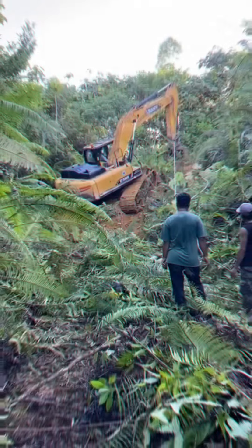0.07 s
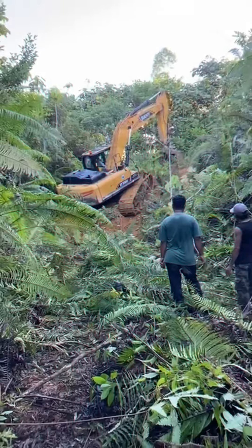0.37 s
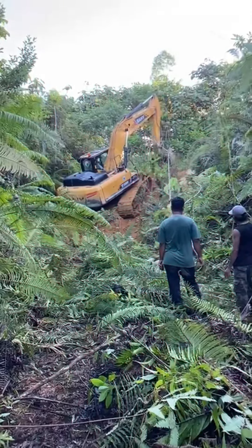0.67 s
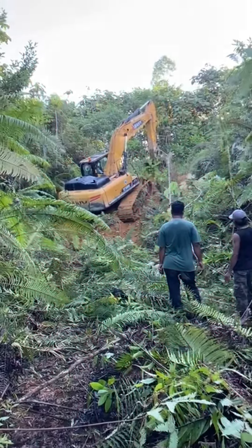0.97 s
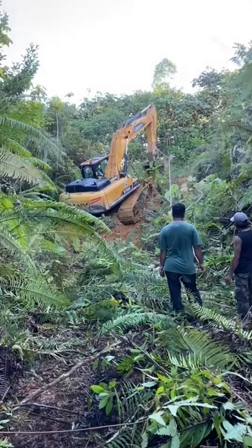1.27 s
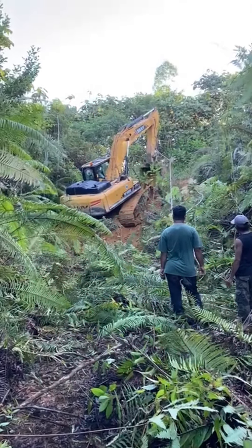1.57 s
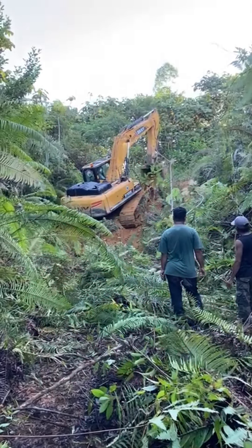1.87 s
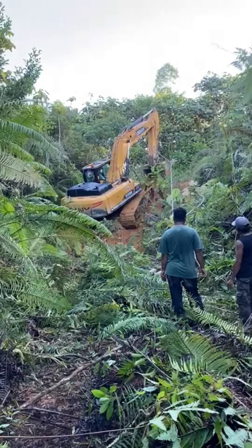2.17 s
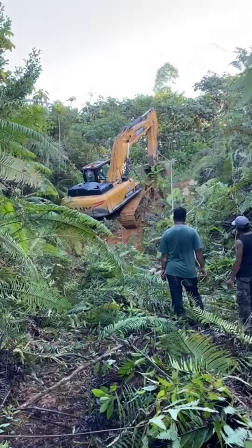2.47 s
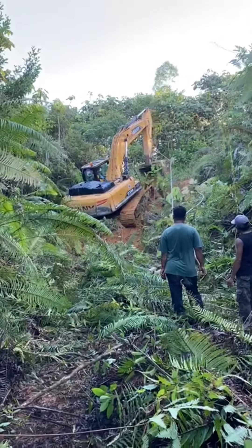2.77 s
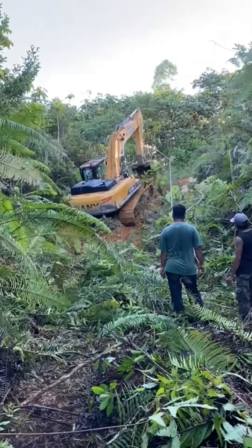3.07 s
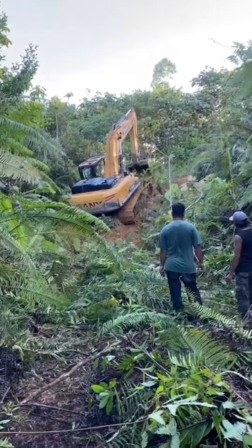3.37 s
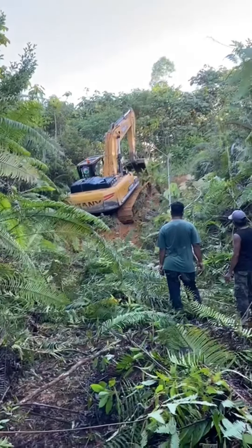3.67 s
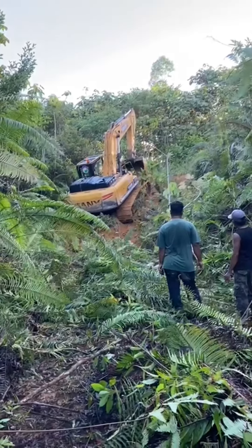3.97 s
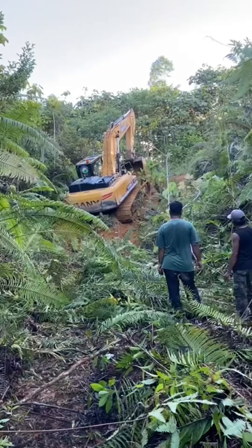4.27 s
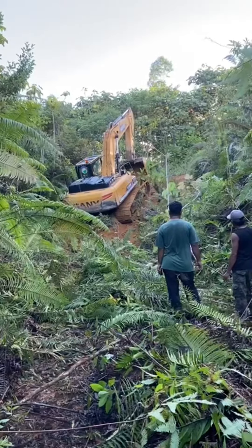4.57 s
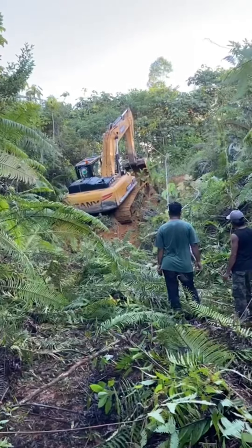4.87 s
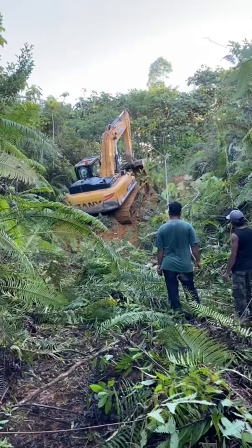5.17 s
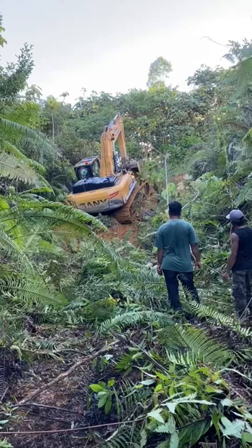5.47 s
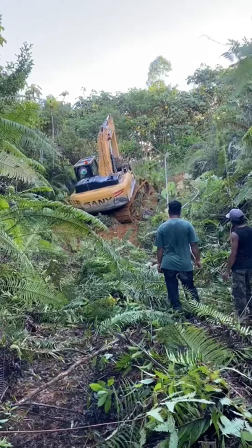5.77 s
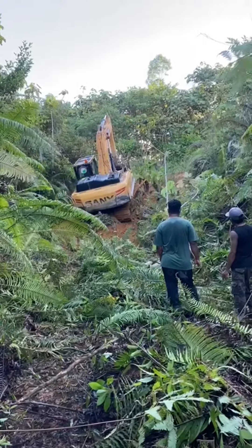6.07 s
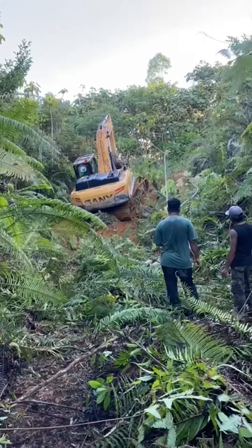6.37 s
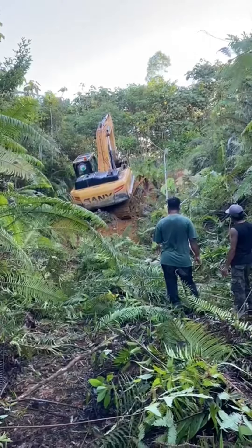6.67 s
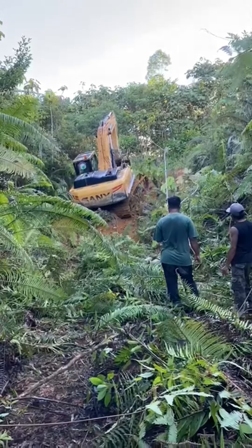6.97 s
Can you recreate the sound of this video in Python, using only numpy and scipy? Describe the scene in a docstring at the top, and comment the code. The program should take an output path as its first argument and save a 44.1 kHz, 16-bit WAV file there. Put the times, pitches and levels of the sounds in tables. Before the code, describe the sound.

Steel clanks and knocks from a digging excavator sound over its steady low engine rumble and thin hydraulic whine.

```python
"""A six-cylinder diesel drones some way off, sagging under load: an excavator digs on a forest slope.
Its firings sound the exhaust and make the casing throb; fan, gears and pump turn with the crankshaft,
so their tones sag with it. Oil hisses and squeals through the valves, and a turbocharger whistles faintly.
Impacts of bucket and tracks excite the modes of the steel, which clanks, rattles and booms.
The trees smear each blow and scatter the sound, so that it differs between left and right."""
import sys
import numpy as np
from scipy import signal
from scipy.fft import rfft, irfft, next_fast_len
from scipy.io import wavfile

SR = 44100
rng = np.random.default_rng(int(sys.argv[2]) if len(sys.argv) > 2 else 0)


def generate_wav(signal):
    """Clip the signal to [-1, 1] and save it as 16-bit WAV at the path in sys.argv[1]."""
    frames = np.transpose(np.atleast_2d(signal))
    scaled = np.clip(frames, -1, 1) * 32767
    pcm = np.round(scaled).astype(np.int16)
    wavfile.write(sys.argv[1], SR, pcm)


N = 313551
PADDED = next_fast_len(N + SR // 4, True)
TIME, FREQS = np.arange(N) / SR, np.maximum(np.fft.rfftfreq(PADDED, 1 / SR), 1)

# engine speed, sagging whenever the pump takes load: (time [s], firing rate [Hz])
FIRING_RATE = [(0, 89.2), (.45, 88.3), (.7, 89.3), (1.05, 89), (1.27, 85.8), (1.45, 86.5), (1.8, 88.5),
               (2.1, 89.3), (2.6, 88.4), (3.0, 89.4), (3.35, 88.5), (3.58, 86.0), (3.78, 86.7), (4.0, 87.5),
               (4.3, 90), (4.5, 90.3), (4.63, 86.7), (5.05, 88.8), (5.95, 88.9), (6.13, 86.4), (6.5, 87.3),
               (7.11, 90.2)]
# how hard the machine strains: (time [s], relative level [dB])
STRAIN = [(0.0, -30), (0.42, -29), (1.19, -30.5), (1.76, -25.5), (2.04, -25.5), (3.42, -29.5), (3.86, -25),
          (4.1, -26.5), (4.43, -25.5), (5.25, -22.5), (5.58, -28), (7.11, -29)]
# exhaust partials: (multiple of the firing rate [1], relative level [dB])
EXHAUST_PARTIALS = [(5 / 6, -26), (1, -1.56), (1.26, -15.5), (2, -8.5), (3.2, -33), (6.3, -19.5)]
# noise spectra of the engine and its cooling duct: (frequency [Hz], relative density [dB])
RUMBLE_SPECTRUM = [(20, -41), (35, -19), (48, -15.5), (62, -3), (80, -6.5), (112, 0.5), (135, -3),
                   (175, -7), (205, -20), (260, -20.5)]
CASING_SPECTRUM = [(150, -5.5), (205, -0.5), (250, -5.5), (310, -4.5), (380, -2.5), (470, -5), (540, -13.5),
                   (620, -23.5), (800, -48)]
CLATTER_SPECTRUM = [(480, 5), (640, 3), (850, 1), (1130, 3), (1450, -3), (1750, -6.5), (2050, -9),
                    (2400, -4.5), (2700, -12.5), (3000, -30), (4000, -26)]
DUCT_SPECTRUM = [(400, -18.5), (435, -3), (458, -5), (490, -10)]
# resonances of the engine covers: (frequency [Hz], width [Hz], boost [dB])
COVER_MODES = [(286.1, 3.6, 7), (455, 9.6, 2.5), (473, 6, 7)]
# the duct drones while it faces the listener: (time [s], relative level [dB])
DUCT_LEVEL = [(0, -28.5), (.7, -32.5), (1.17, -27), (1.4, -41), (1.75, -29), (2.1, -42), (2.6, -29.5),
              (3.1, -34.5), (3.4, -36.5), (7.11, -47.5)]

# blows of bucket and tracks: (time [s], strength [dB], hardness [dB], extra thud [dB],
# extra ring [dB], centre of the ring [Hz], rattle length [s])
BLOWS = [(1.115, -19, 2, -0.5, 1.5, 1110, 0.032), (1.474, -22.5, -6, 4.5, -1, 804, 0.031),
         (1.554, -12.5, 4, -2, 0.5, 1080, 0.043), (1.686, -28.5, -6, 8.5, -5, 826, 0.012),
         (1.794, -16, 14, 1, 6.5, 1165, 0.037), (1.905, -17, -5, 2.5, -1, 800, .035),
         (2.306, -27.5, -2, -4, 3, 950, 0.0079), (2.362, -25.5, 3, 2, 4.5, 800, 0.015),
         (2.5, -23.5, 7, -2, 2.5, 1020, 0.026), (2.666, -24.5, 5, 1, 5.5, 900, 0.02),
         (2.914, -21, -11, -1, -1.5, 940, 0.015), (3.161, -17, -6, 0, -8, 1090, 0.013),
         (3.822, -17.5, 0, 1.5, 1, 810, 0.023), (3.847, -14, -5.5, 1, 2, 810, 0.026),
         (4.029, -15.5, 0, 2.5, -2.5, 854, 0.075), (4.08, -13.5, 5, 1.5, 3.5, 870, 0.077),
         (4.219, -19, -5.5, 0.5, 3, 875, 0.057), (4.283, -20.5, -32, 3.5, 9, 860, 0.011),
         (4.377, -30, -17, 7, 10, 880, 0.013), (4.628, -18.5, -5, 4.5, -6, 730, 0.037),
         (4.731, -17.5, -2, 4, 2.5, 1000, 0.074), (4.774, -13, 3, 1.5, 2.5, 713, 0.048),
         (5.024, -13, 10.5, 0.5, -3.5, 920, 0.026), (5.046, -12, 6.5, 0, 7, 975, 0.0075),
         (5.199, -14.5, 3.5, 1, 0.5, 920, 0.027), (5.356, -17.5, 0, 2, 5.5, 975, 0.015),
         (5.379, -15.5, -3, -1.5, 3, 830, 0.016), (5.407, -19.5, 7, 3.5, -16, 740, 0.023),
         (5.835, -16, -9, -5, -11, 915, 0.092), (6.634, -11, -2, -4.5, -3, 746, 0.025),
         (6.851, -20.5, -4, -1.5, 1.5, 1080, 0.019), (6.987, -14.5, 0, -5, -0.5, 1110, 0.043)]
# spectra of the four parts of a blow: (frequency [Hz], relative density [dB])
THUD_SPECTRUM = [(35, -29), (65, 4.5), (130, -1.5), (240, -2.5), (285, 1.5), (350, -1.5), (480, 1),
                 (600, -18), (850, -7)]
CLANK_SPECTRUM = [(450, -19), (640, 3), (830, -3), (1030, 2.5), (1200, -14.5), (1450, -17)]
CLACK_SPECTRUM = [(1050, -32), (1350, 9.5), (1480, 3.5), (1700, 0), (2000, 0.5), (2350, 2.5), (2750, -8),
                  (3600, -36)]
CRACK_SPECTRUM = [(2300, -3.5), (3100, 10.5), (4300, 3), (5500, 2.5), (7500, -8), (9800, -7.5),
                  (12000, -20)]
# resonances of the bucket's steel: (frequency [Hz], width [Hz], boost [dB])
STEEL_MODES = [(357, 36, 7.5), (717, 7.9, 8.5), (793, 26, -5), (940, 47, 0), (1128, 37, 11.5),
               (1390, 70, -6)]
# ringing plates of the bucket: (frequency [Hz], relative level [dB])
PLATE_MODES = [(703, -11.5), (780, -9), (830, -7), (915, -10), (1020, -15), (1163, -9)]
# steel meets steel squarely: (time [s], level [dB], tilt [dB/octave])
SNAPS = [(1.478, -25, -14), (1.56, -23, -1), (1.798, -26.5, -2), (1.909, -16.5, -13), (2.313, -22, -13),
         (2.669, -25.5, -6), (3.175, -22.5, 3), (3.848, -19, -12.5), (4.29, -25, -12), (5.058, -19, 1.5),
         (5.193, -21, -1), (5.356, -22.5, -5), (5.38, -16.5, -7), (6.636, -31, -3), (6.988, -20, 4)]
# plate modes that a snap excites: (frequency [Hz])
SNAP_MODES = [826, 987, 1190, 1418, 1830, 2265]
# the hollow bucket knocks on earth and roots: (time [s], relative level [dB], centre of the boom [Hz])
KNOCKS = [(1.688, -9.5, 430), (1.817, -9, 333), (2.308, -18, 453), (2.912, -18, 420), (3.148, -18, 380),
          (4.087, -9, 390), (4.14, -11.5, 310), (4.287, -9, 430), (4.385, -15.5, 292), (4.626, -19, 404),
          (4.782, -15, 410), (5.059, -14, 320), (5.242, -11, 310)]
# modes of the bucket's shell: (frequency [Hz])
SHELL_MODES = [277, 326.5, 348, 391, 433, 481]
# the machine rocks on its tracks: (time [s], frequency [Hz], level [dB])
BUMPS = [(1.683, 71.7, -13.5), (1.83, 130.4, -19), (1.91, 139.2, -17), (3.862, 71, -13.5), (4.07, 79.5, -8),
         (4.37, 73, -22), (4.791, 90, -15), (5.4, 102, -14.5), (5.707, 81, -18.5), (5.85, 57.5, -19.5),
         (6.631, 145, -17)]

# pump harmonics: (multiple of the piston rate [1], relative level [dB])
PUMP_HARMONICS = [(2, -3), (4, -13), (6, -14), (8, -23), (9, -13.5), (10, -13.5), (12, -19)]
# singing valves: (time [s], length [s], multiple of the piston rate [1], level [dB])
SQUEALS = [(.02, 1, 16, -57), (0.546, 0.36, 9, -46), (1.08, 0.23, 12, -46), (1.244, .26, 9, -37.5),
           (1.23, 0.27, 2, -31), (2.8, 0.31, 9, -43), (3.37, 0.21, 12, -39), (3.38, .16, 20, -55),
           (4.504, 0.14, 9, -43), (3.37, .17, 14, -45), (3.603, 0.28, 9, -43), (4.56, 0.19, 14, -42),
           (4.95, 0.77, 14, -56), (5.03, 0.29, 16, -48), (5.88, 0.17, 14, -50), (6.247, 0.12, 12, -48)]
# brief, thin, high squeaks, mostly of the hydraulics: (time [s], length [s], frequency [Hz], level [dB])
SQUEAKS = [(1.09, .1, 3150, -43), (3.968, 0.064, 3160, -43), (4.718, 0.036, 5180, -46)]
# noise of oil through the valves: (time [s], relative level [dB])
OIL_FLOW = [(0.0, -40), (1.08, -42), (1.22, -39.5), (1.48, -39), (2.18, -42), (2.65, -42), (3.37, -45.5),
            (3.42, -40.5), (3.52, -40.5), (3.62, -41), (4.06, -38.5), (4.2, -45), (4.5, -42.5),
            (5.27, -40.5), (5.6, -43), (5.96, -44.5), (7.11, -41.5)]
# spectra of the oil's hiss and fine spray: (frequency [Hz], relative density [dB])
HISS_SPECTRUM = [(2200, 18), (3000, 11), (3400, 11.5), (3900, 7), (4300, 7), (4800, 6.5), (5200, 0.5),
                 (6000, 6), (6700, -20.5), (7300, -9.5), (8300, -25.5), (9500, 0.5)]
SPRAY_SPECTRUM = [(6200, 3), (7200, 7), (8500, 3), (9500, 3), (10500, 3.5), (11700, 0)]
# resonances of valve block and hoses: (frequency [Hz], width [Hz], boost [dB])
VALVE_MODES = [(3410, 120, 2.5), (4350, 230, 5.5), (5214, 310, 11.5)]
# spurts of fine spray: (time [s], Gaussian width [s], level [dB])
SPURTS = [(.48, 0.3, -51), (3.92, 0.041, -40), (4.09, 0.079, -49.5), (6.56, 0.081, -46.5)]

# gear whine, fading as the machine swings round: (time [s], low mesh level [dB], high mesh level [dB])
GEAR_LEVELS = [(0, -36, -35.5), (.35, -43, -48.5), (.53, -40, -44.5), (.6, -34, -38), (.74, -29.5, -43),
               (.95, -37, -50.5), (2.2, -44, -41), (2.5, -33.5, -47), (3.1, -38.5, -43.5), (3.4, -49, -50),
               (4.2, -34, -59), (7.11, -52.5, -73)]
# the turbocharger spools up and coasts down: (time [s], frequency [Hz])
TURBO_PITCH = [(0, 9100), (.2, 8890), (.72, 8900), (1.18, 8150), (1.45, 8900), (1.7, 9230), (2.1, 8680),
               (2.5, 8080), (2.97, 8160), (3.5, 7700), (4.1, 8900), (4.5, 8470), (4.8, 8950), (5.1, 8450),
               (5.45, 8680), (5.75, 8580), (6.0, 8300), (6.55, 9600), (6.75, 9600), (6.95, 9200),
               (7.11, 9080)]
# two microphone ports: (frequency [Hz], left minus right [dB], left lead [rad], coherence [0-1])
PORTS = [(200, 0, 0, 1), (300, -.8, .03, .995), (450, -3.5, .45, .98), (600, .5, 1.2, .88),
         (700, 6, 1.7, .7), (790, 13, 3.9, .25), (880, 9, 5.1, .87), (1000, 4.5, 5.4, .87),
         (1200, 1, 6.1, .96), (1450, 5, 6.5, .93), (1650, 6, 5.6, .4), (2100, 0, 6.1, .97),
         (2650, 0, 6.9, .8), (2880, -2, 8.3, .3), (3150, -1, 6.8, .7), (3450, 0, 6.3, .5),
         (4200, 0, 6.3, .94), (5400, 0, 6.35, .87), (6000, .5, 7.6, .45), (6600, 0, 9.42, .999),
         (8100, 0, 9.43, .999), (8800, 0, 10.9, .45), (9500, 0, 12.57, .99)]


def excavator(free_hz=89.2, loaded_hz=87.0):
    """Governor droop: speed sags in proportion to load, and all that the crankshaft drives follows."""
    firing_hz, = in_time(FIRING_RATE)
    firings = np.cumsum(firing_hz) / SR  # phase in cycles
    strokes = 3 * firings  # nine pump pistons a turn give three pulses a firing
    load = np.clip((free_hz - firing_hz) / (free_hz - loaded_hz), 0, 1)
    throb = np.cos(2 * np.pi * firings) + np.cos(np.pi * firings)
    engine = diesel(firings, load, throb) + cooling(firings, throb) + gears(firings) + turbocharger()
    hydraulics = pump(strokes, load) + squeals(strokes, firings) + oil(strokes) + hose_ring(strokes)
    digging = blows() + plate_ring() + snaps() + knocks() + bumps()
    return engine + digging + hydraulics + squeaks()


def diesel(firings, load, throb):
    """Periodic forcing: firings sound an exhaust note that swells with load, and shake the casing."""
    strain_db, = in_time(STRAIN)
    swing_db = strain_db - strain_db.mean()
    note = sum(from_db(db) * tone(k * firings, waver_db=1.1, blur_rad=0.074, rate_hz=7.8)
               for k, db in EXHAUST_PARTIALS)
    exhaust = from_db(-34 + 10 * load + 0.12 * swing_db) * note
    rumble = from_db(-28 + 0.29 * swing_db) * noise(RUMBLE_SPECTRUM)
    casing = from_db(-29 + swing_db + 1.1 * throb) * noise(CASING_SPECTRUM, COVER_MODES)
    clicks = colour(grains(per_s=6000, spread_db=3.5), CLATTER_SPECTRUM)
    clatter = from_db(-36 + 0.21 * swing_db + 0.25 * throb) * clicks
    return exhaust + rumble + casing + clatter


def cooling(firings, throb):
    """Blade passage gives the fan its hum; resonance narrows the duct's noise to a drone."""
    fan = from_db(-30.5) * tone(1.8 * firings, waver_db=1.7, blur_rad=0.11, rate_hz=17)
    duct_db, = in_time(DUCT_LEVEL)
    return fan + from_db(duct_db - 2.6 + 2 * throb) * noise(DUCT_SPECTRUM)


def blows():
    """Impact noise: bursts of contacts excite frame and bucket; the harder the blow, the brighter."""
    _, db, hardness_db, thud_db, ring_db, _, _ = np.transpose(BLOWS)
    thud = blow_envelope(db + thud_db - 9, rise_s=0.012, t60=0.53, tail_db=-10, tail_t60=1.0)
    thud *= colour(grains(per_s=1200, spread_db=1.0), THUD_SPECTRUM, STEEL_MODES)
    clank = blow_envelope(db + ring_db - 18.5, rise_s=0.016, t60=0.32, tail_db=-5.5, tail_t60=1.0)
    clank *= colour(grains(per_s=1600, spread_db=6.5), CLANK_SPECTRUM, STEEL_MODES)
    clack_db, crack_db = db + 0.41 * hardness_db - 19, db + 0.81 * hardness_db - 31.5
    clack = blow_envelope(clack_db, rise_s=0.003, t60=0.42, tail_db=-26, tail_t60=0.19)
    clack *= colour(grains(per_s=3000, spread_db=1.5), CLACK_SPECTRUM)
    crack = blow_envelope(crack_db, rise_s=0.0033, t60=0.41, tail_db=-11, tail_t60=0.29)
    crack *= colour(grains(per_s=3800, spread_db=1.0), CRACK_SPECTRUM)
    return thud + clank + clack + crack


def blow_envelope(levels_db, rise_s, t60, tail_db, tail_t60, contact_db=-4.5, contact_s=0.014):
    """Incoherent blows add in power: each hits, rattles on, dies and reverberates among the trees."""
    power = np.zeros(N)
    for (s, *_, rattle_s), db in zip(BLOWS, levels_db):
        start = int((s - rise_s / 2) * SR)
        age = TIME[:N - start][:SR]
        after = np.maximum(age - rattle_s, 0)
        contact = from_db(contact_db) * np.exp(-age / contact_s)
        rattle = from_db(-60 * after / t60)
        tail = from_db(tail_db - 60 * after / tail_t60)
        shape = np.minimum(age / rise_s, 1) * (contact + rattle + tail)
        power[start:start + len(age)] += (from_db(db) * shape) ** 2
    return np.sqrt(power)


def plate_ring(rise_s=0.006, t60=0.25, fall_db_per_octave=63):
    """Free vibration: a blow sets the bucket's plates ringing, most of all the one where it lands."""
    out = np.zeros(N)
    for s, db, _, _, ring_db, centre_hz, _ in BLOWS:
        start = int(s * SR)
        age = TIME[:N - start][:SR // 4]
        fade = np.minimum(age / rise_s, 1) * from_db(db + ring_db - 60 * age / t60)
        for hz, plate_db in PLATE_MODES:
            gain = from_db(plate_db - fall_db_per_octave * abs(np.log2(hz / centre_hz)))
            out[start:start + len(age)] += gain * fade * sine(hz * age)
    return out


def snaps(decay_s=0.005):
    """Impulse response: a square hit rings several plate modes for a few milliseconds."""
    out, age = np.zeros(N), TIME[:SR // 20]
    fade = np.minimum(age * SNAP_MODES[-1], 1) * np.exp(-age / decay_s)
    for s, db, tilt_db in SNAPS:
        start = int(s * SR)
        plates = sum(from_db(tilt_db * np.log2(hz / SNAP_MODES[0])) * sine(hz * age)
                     for hz in SNAP_MODES)
        out[start:start + len(age)] += from_db(db) * fade * rms_one(plates)
    return out


def knocks(rise_s=0.004, t60=0.12, fall_db_per_octave=26):
    """Damped shell modes: the bucket booms according to where it lands, and earth soon stills it."""
    out, age = np.zeros(N), TIME[:SR // 4]
    for s, db, centre_hz in KNOCKS:
        start = int(s * SR)
        shell = sum(from_db(-fall_db_per_octave * abs(np.log2(hz / centre_hz)))
                    * sine(hz * age, spread_cycles=0.35) for hz in SHELL_MODES)
        fade = np.minimum(age / rise_s, 1) * from_db(db - 2 - 60 * age / t60)
        out[start:start + len(age)] += fade * rms_one(shell)
    return out


def bumps(rise_s=0.019, t60=0.41):
    """Damped oscillation: the whole machine bounces briefly on its tracks."""
    out = np.zeros(N)
    for s, hz, db in BUMPS:
        age = np.maximum(TIME - s, 0)
        out += np.minimum(age / rise_s, 1) * from_db(db - 60 * age / t60) * sine(hz * age)
    return out


def pump(strokes, load):
    """Pressure ripple: the pistons whine at harmonics of their stroke rate, louder under load."""
    whine = sum(from_db(db) * tone(k * strokes, waver_db=4.5, blur_rad=0.66, rate_hz=21)
                for k, db in PUMP_HARMONICS)
    return from_db(-42.5 + 7 * load) * whine


def squeals(strokes, firings):
    """Amplitude modulation: pistons and firings chop a valve's song on one pump harmonic."""
    chop = 1 + 0.4 * np.cos(2 * np.pi * strokes) + 0.25 * np.cos(2 * np.pi * firings)
    return sum(from_db(db) * swell(s, length) * chop * tone(k * strokes, waver_db=2)
               for s, length, k, db in SQUEALS)


def oil(strokes):
    """Flow noise: oil hisses through the valves, pulsing with the pistons, and spurts in fine spray."""
    flow_db, = in_time(OIL_FLOW)
    flutter_db = 0.5 * drift(rate_hz=25) + 0.73 * np.cos(2 * np.pi * strokes)
    hiss = from_db(flow_db - 1.7 + flutter_db) * noise(HISS_SPECTRUM, VALVE_MODES)
    spurts = sum(from_db(db) * np.exp(-0.5 * ((TIME - s) / width) ** 2) for s, width, db in SPURTS)
    spray = np.hypot(from_db(flow_db - 12.5), spurts) * noise(SPRAY_SPECTRUM)
    return hiss + spray


def gears(firings):
    """Tooth meshing: two gear pairs whine at fixed multiples of the crankshaft's speed."""
    low_db, high_db = in_time(GEAR_LEVELS)
    low_mesh = tone(4.37 * firings, waver_db=2.5, blur_rad=0.3, rate_hz=6)
    high_mesh = tone(15.07 * firings, waver_db=3, blur_rad=0.3, rate_hz=15)
    return from_db(low_db) * low_mesh + from_db(high_db) * high_mesh


def squeaks():
    """Tone bursts: brief, thin, high squeaks, mostly the hydraulics singing at a steady pitch."""
    return sum(from_db(db) * swell(s, length) * tone(hz * TIME, waver_db=4)
               for s, length, hz, db in SQUEAKS)


def hose_ring(strokes, swell_db=5):
    """Resonance: hoses and cylinders pick out high pump harmonics, a faint ring that shifts at random."""
    out = np.zeros(N)
    for k in range(13, 23):
        gain = from_db(swell_db * np.clip(drift(rate_hz=3.5), -2, 2))
        out += rms_one(gain * tone(k * strokes, waver_db=3.5))
    return from_db(-62) * out


def turbocharger(db_per_hz=0.003):
    """Rotor tone: a faint whistle that rises in pitch and level as the turbocharger spools up."""
    hz, = in_time(TURBO_PITCH)
    whistle = tone(np.cumsum(hz) / SR, waver_db=5, blur_rad=0.8)
    return from_db(-64.5 + db_per_hz * (hz - hz.mean())) * whistle


def microphones(direct, scattered):
    """Partial coherence: direct sound reaches two ports unequally; foliage scatter parts them further."""
    balance_db, lead, coherence = in_pitch(PORTS)
    common = np.sqrt((1 + coherence) / 2) * rfft(direct, PADDED)
    apart = np.sqrt((1 - coherence) / 2) * rfft(scattered, PADDED)
    port = from_db(balance_db / 2) * np.exp(0.5j * lead)
    return irfft(np.array([(common + apart) * port, (common - apart) / port]), PADDED)[:, :N]


def tone(cycles, waver_db, blur_rad=0.45, rate_hz=35):
    """Random modulation: a unit-power partial wavers in level and phase on its way through the air."""
    gain = from_db(waver_db * drift(rate_hz))
    return rms_one(gain * np.sin(2 * np.pi * (cycles + rng.random()) + blur_rad * drift(rate_hz)))


def sine(cycles, spread_cycles=1):
    """Simple harmonic motion with a random starting phase."""
    return np.sin(2 * np.pi * (cycles + spread_cycles * rng.random()))


def swell(start_s, length_s):
    """Half-sine envelope."""
    return np.sin(np.pi * np.clip((TIME - start_s) / length_s, 0, 1))


def drift(rate_hz, step=40, settle=2000):
    """Low-pass noise: a slow fluctuation of unit power."""
    pole = np.exp(-2 * np.pi * rate_hz * step / SR)
    white = rng.standard_normal(N // step + settle + 2)
    slow = signal.lfilter([1], [1, -2 * pole, pole * pole], white)[settle:]
    return np.interp(np.arange(N) / step, np.arange(len(slow)), rms_one(slow))


def grains(per_s, spread_db):
    """Shot noise: random clicks of uneven size."""
    clicks = (rng.random(N) < per_s / SR) * rng.choice([-1, 1], N)
    return clicks * from_db(spread_db * np.clip(rng.standard_normal(N), -2, 2))


def noise(spectrum, modes=()):
    """Filtered Gaussian noise of unit power."""
    return colour(rng.standard_normal(N), spectrum, modes)


def colour(x, spectrum, modes=(), skirt_db_per_octave=47):
    """Source and filter: x takes on a spectrum with steep skirts and resonant peaks, at unit power."""
    db, = in_pitch(spectrum)
    octaves_outside = np.abs(np.log2(FREQS / np.clip(FREQS, spectrum[0][0], spectrum[-1][0])))
    for hz, width_hz, peak_db in modes:
        db = db + peak_db / (1 + (2 * (FREQS - hz) / width_hz) ** 2)
    gain = from_db(db - skirt_db_per_octave * octaves_outside)
    return rms_one(irfft(rfft(x, PADDED) * gain, PADDED)[:N])


def in_time(rows):
    """Interpolate each column at every sample."""
    s, *columns = np.transpose(rows)
    return [np.interp(TIME, s, c) for c in columns]


def in_pitch(rows):
    """Interpolate each column over log frequency."""
    hz, *columns = np.transpose(rows)
    return [np.interp(np.log(FREQS), np.log(hz), c) for c in columns]


def from_db(db):
    """Decibels to amplitude ratio."""
    return 10 ** (np.asarray(db) / 20)


def rms_one(x):
    """Scale to unit power."""
    return x / np.sqrt(np.mean(x ** 2) + 1e-20)


def scene():
    """Scattering: sound from the foliage follows the same motions, with unrelated fine grain."""
    return microphones(direct=excavator(), scattered=excavator())


def record(dry, cutoff_hz=11800):
    """Band limiting: a steep low-pass filter removes the highest treble."""
    return signal.sosfilt(signal.ellip(12, 0.2, 80, cutoff_hz, fs=SR, output="sos"), dry)


dry = scene()
out = record(dry)
generate_wav(out)
```